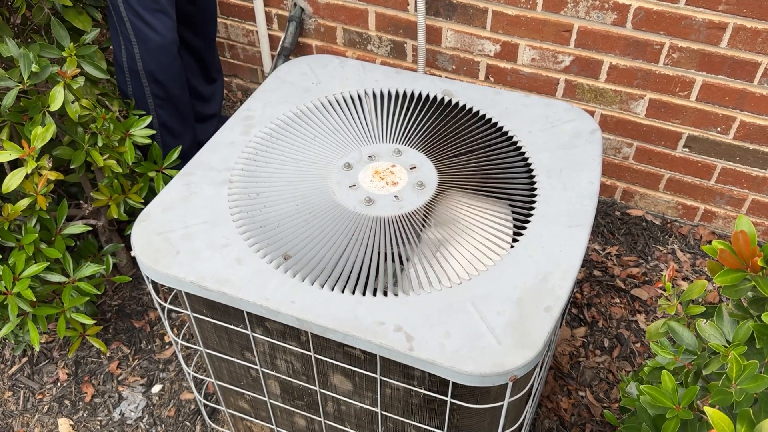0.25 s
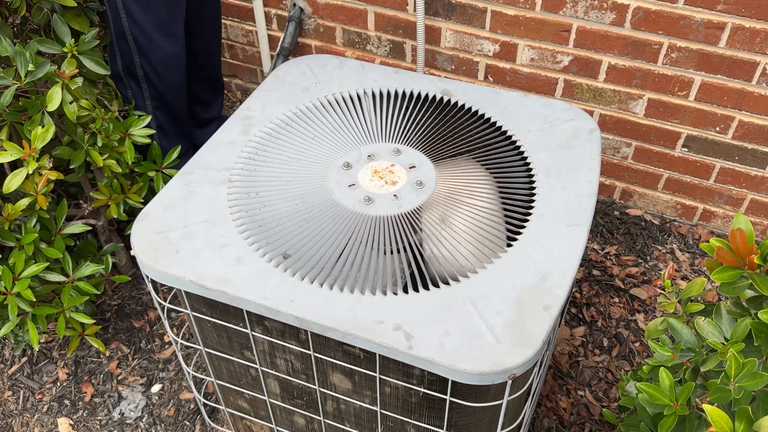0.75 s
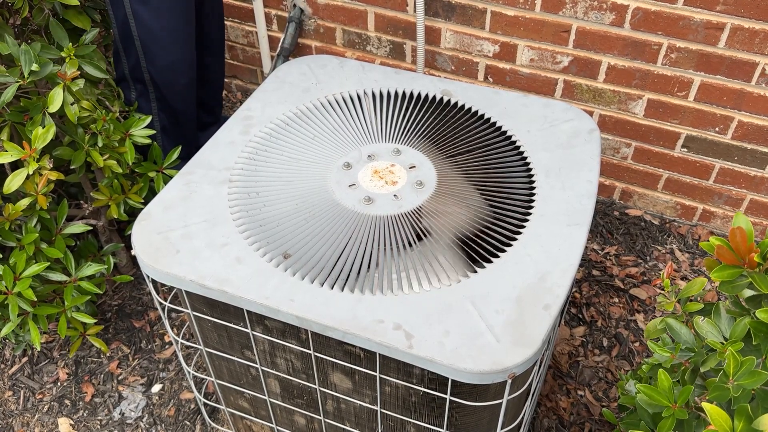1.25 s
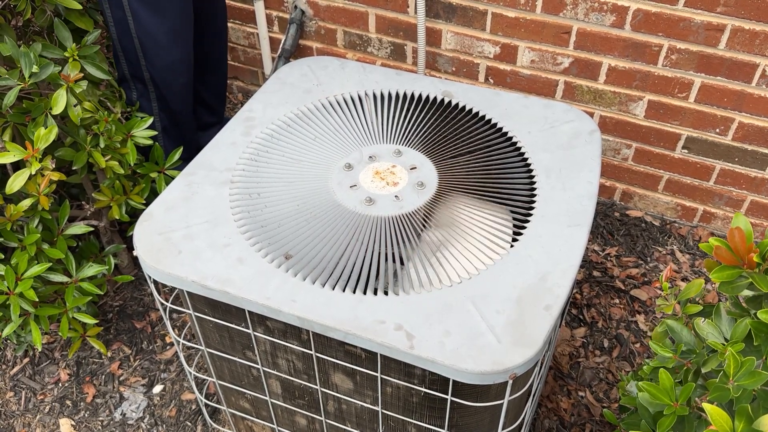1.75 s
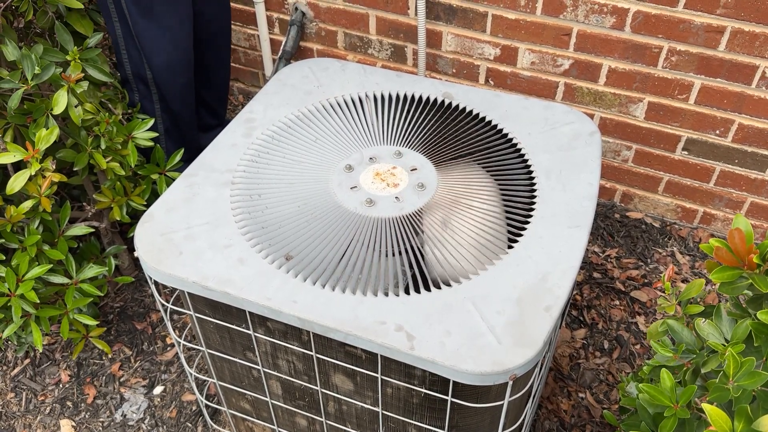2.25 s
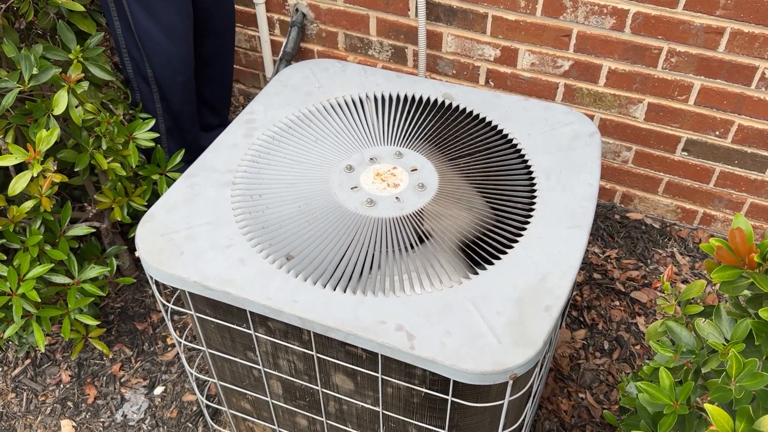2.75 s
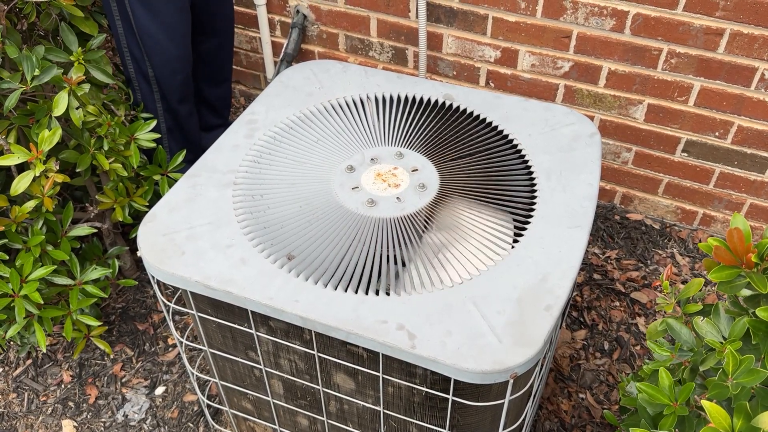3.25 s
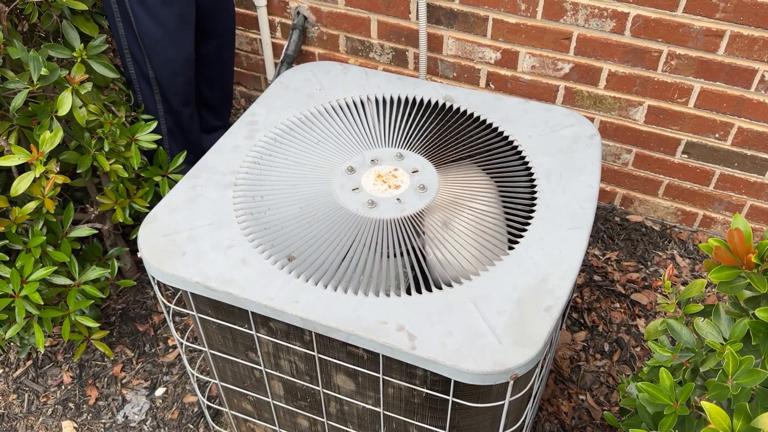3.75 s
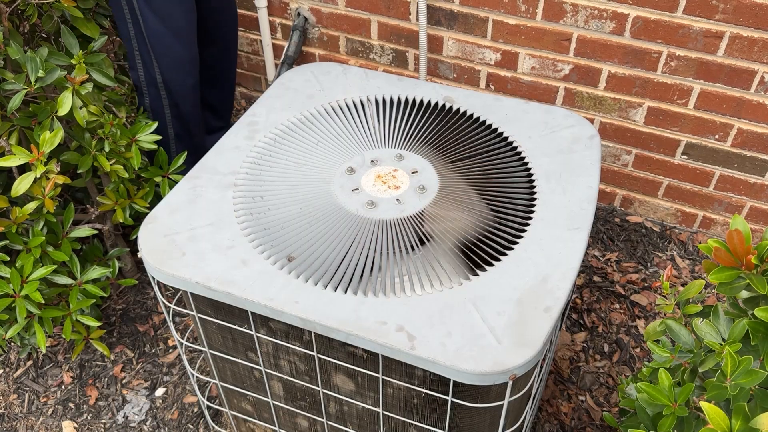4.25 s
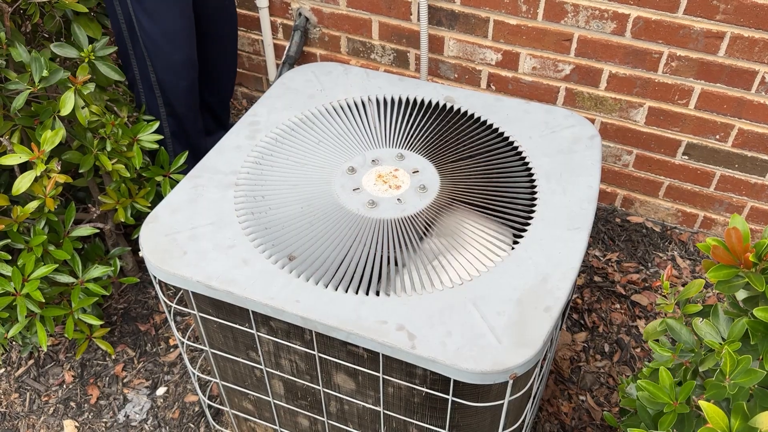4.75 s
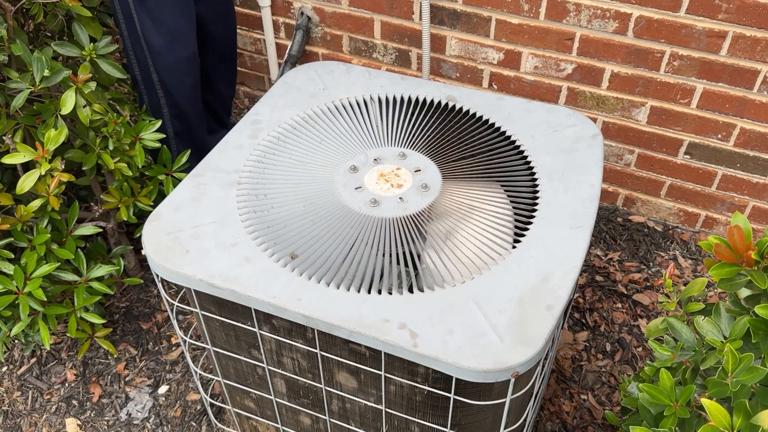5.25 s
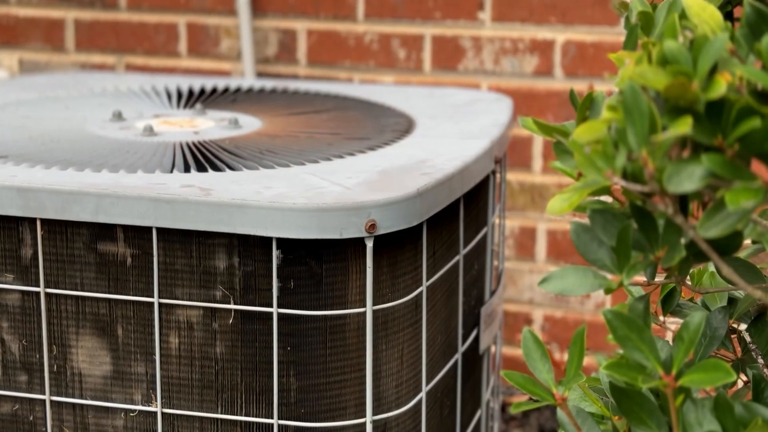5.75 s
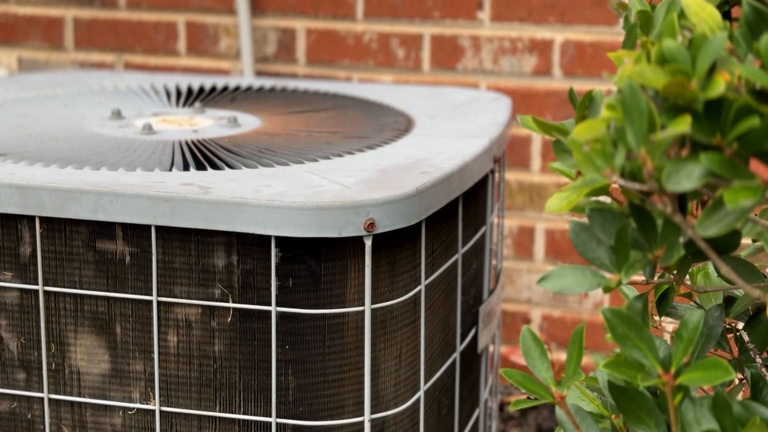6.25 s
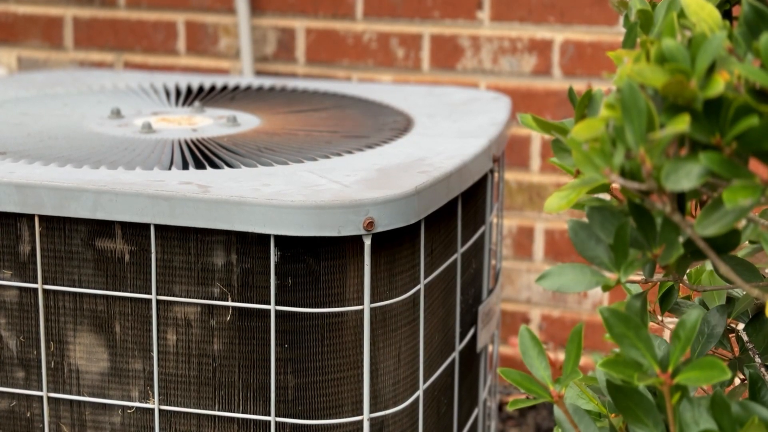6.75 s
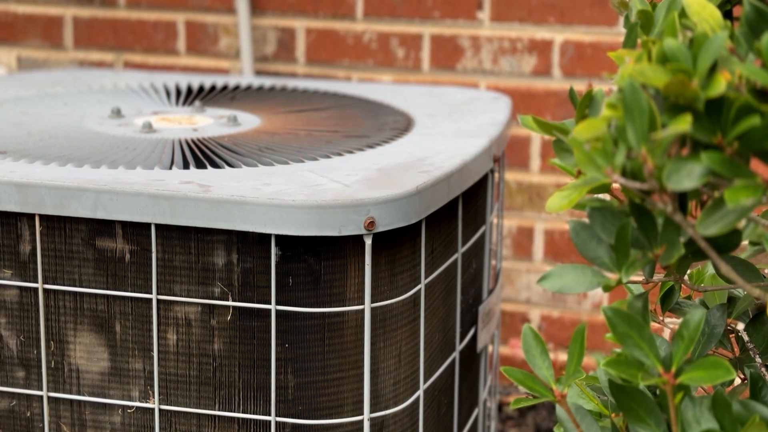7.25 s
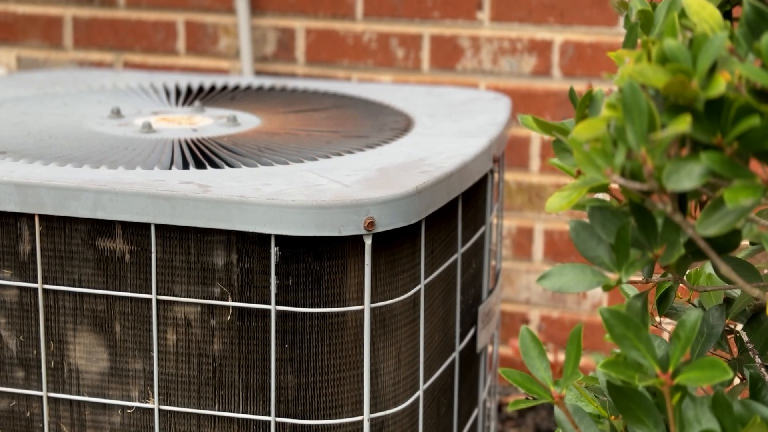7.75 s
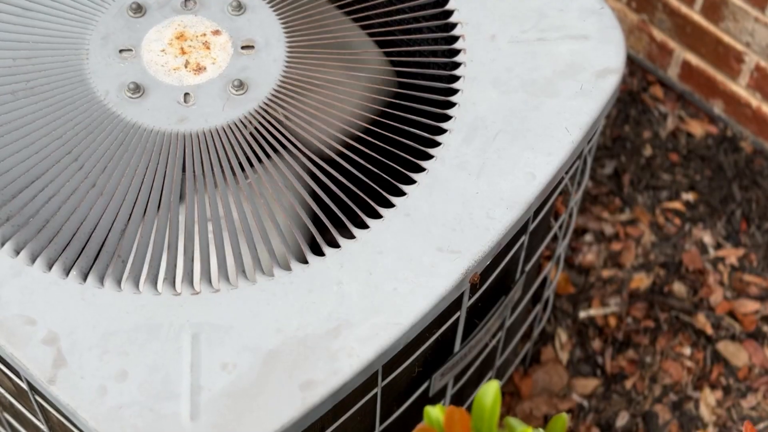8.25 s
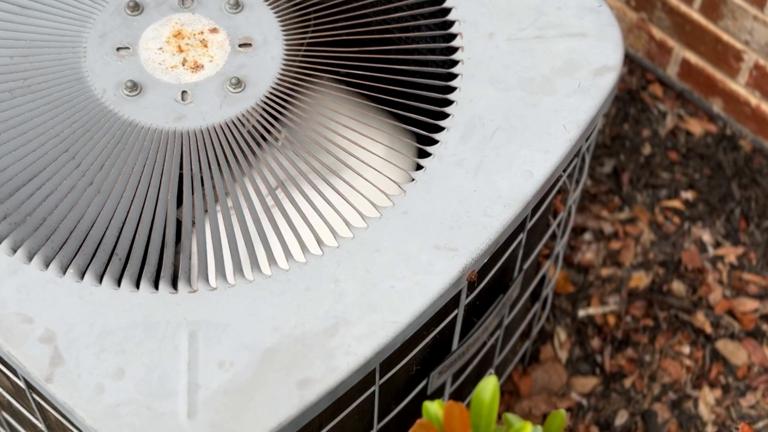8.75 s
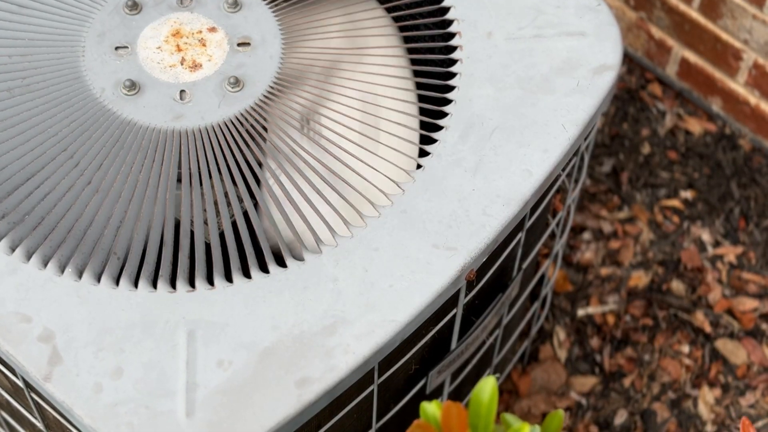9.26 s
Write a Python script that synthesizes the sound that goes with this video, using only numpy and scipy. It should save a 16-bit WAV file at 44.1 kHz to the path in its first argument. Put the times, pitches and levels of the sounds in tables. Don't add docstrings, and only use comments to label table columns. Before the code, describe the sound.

Steady air conditioner drone and whooshing fan air, with a faint distant engine in the middle and one tiny dropout.

```python
import sys
import numpy as np
from scipy import signal
from scipy.fft import rfft, irfft, next_fast_len
from scipy.io import wavfile
from scipy.ndimage import uniform_filter1d

SR = 44100
rng = np.random.default_rng(int(sys.argv[2]) if len(sys.argv) > 2 else 0)


def nominal_scale(level):
    x = np.asarray(level, float) / 20
    return 10 ** x


def file_out(sig):
    cols = np.atleast_2d(sig).T
    lim = np.clip(cols, -1, 1)
    pcm = np.round(lim * 32767).astype(np.int16)
    wavfile.write(sys.argv[1], SR, pcm)


N = 419391

CUTS_S = [
    5.445,
    7.995,
]
DROPOUT_S = [
    7.4322,
    7.4525,
]

# time in seconds, pitch in Hz, peak level in dB.
FAR_ENGINE = [
    (5.46, 205, -42),
    (5.75, 203, -32),
    (6.1, 196, -34),
    (6.4, 192, -34),
    (6.8, 196, -41),
    (7.1, 195, -49),
    (7.45, 182, -49),
    (7.75, 183, -34.5),
    (7.99, 186, -35),
]
ENGINE_PORT_TURN = 0.58

# one place, rate in Hz.
SHAFT_HZ = [
    58.85,
    58.808,
    58.786,
]
BLADE_HZ = [
    57.3,
    57.45,
    57.35,
]
MAINS_HZ = 60.02

# frequency in Hz, level in dB per Hz.
AIR = [
    [(30, -83), (55, -50.5), (130, -51.5), (280, -51), (500, -56), (830, -62.5), (1500, -69.5), (2300, -72),
     (3100, -79), (4700, -82), (7800, -85), (10000, -87.5), (13300, -86.5), (15500, -94)],
    [(30, -83), (55, -51.5), (130, -53), (240, -54), (700, -65), (1050, -67.5), (1500, -73.5),
     (3000, -81.5), (4600, -84), (8300, -88), (9200, -94), (11300, -96.5), (13500, -91), (15500, -95)],
    [(30, -77), (55, -50), (130, -49), (260, -55), (600, -60), (1050, -66), (1800, -75), (3000, -78),
     (4600, -82), (7800, -85.5), (9200, -93), (11300, -92), (13500, -87.5), (15500, -95)],
]
# centre in Hz, width in Hz, lift in dB.
CABINET = [
    [(854, 57, -6.5), (1000, 270, 2.5), (2300, 370, 1), (3600, 420, 3.5), (4550, 200, 4), (5180, 190, 4.5),
     (6640, 260, 0.5), (6570, 530, 2.5)],
    [(169, 13, -3), (800, 140, 3), (1790, 200, 1), (2860, 190, 6.5), (4770, 440, 1.5), (7800, 500, -0.5)],
    [(785, 350, 4), (1510, 370, 2), (2850, 300, 1.5), (6400, 1100, 1)],
]
# multiple, blade level in dB, shaft level in dB, mains level in dB.
HUM = [
    [(1, -40, -51, -59), (2, -36, -36, -52), (3, -42, -47, -55), (4, -39, -38, -37), (5, -44, -56, -56)],
    [(1, -47, -45, -46), (2, -40, -60, -60), (3, -58, -60, -55), (4, -49, -31, -39), (5, -60, -52, -60)],
    [(1, -40, -50, -47), (2, -31, -40, -58), (3, -53, -51, -60), (4, -39, -39, -42), (5, -49, -55, -59)],
]

# multiple, level in dB.
SHELL = [
    [(6, -42), (8, -45), (15, -54), (18, -50), (19, -52), (26, -58), (28, -59), (38, -60), (41, -61),
     (55, -67), (61, -67), (86, -66), (105, -70), (115, -69)],
    [(7, -47), (14, -52), (16, -43), (18, -40), (19, -46), (20, -45), (22, -48), (25, -51), (31, -50),
     (47, -50), (55, -58), (54, -59), (84, -62), (134, -65)],
    [(7, -48), (16, -41), (18, -39), (20, -43), (26, -51), (27, -52), (47, -52), (48, -56), (51, -56),
     (84, -61), (98, -61), (106, -61), (111, -64), (133, -66)],
]
# high shaft multiple, level in dB.
WHINE = [
    [(151, -71), (165, -74), (184, -65), (185, -71), (186, -68), (206, -76), (207, -75), (209, -74),
     (212, -77), (223, -72), (224, -70), (233, -73), (250, -76), (251, -76)],
    [(151, -78), (157, -70), (164, -70), (169, -66), (172, -66), (178, -70), (181, -68), (210, -71),
     (215, -70), (221, -67), (224, -69), (226, -66), (234, -65), (248, -70)],
    [(141, -75), (148, -75), (163, -75), (164, -71), (176, -71), (181, -72), (184, -71), (190, -72),
     (197, -74), (202, -72), (204, -70), (207, -71), (228, -71), (235, -69)],
]
# centre in Hz, width in Hz, lift in dB.
SHELL_RING = [
    [(2750, 500, -7), (5320, 250, 6), (7200, 300, -4)],
    [(1350, 600, 3), (3020, 360, 1), (5450, 300, 2)],
    [(1350, 600, 1.5), (3000, 560, 2), (6960, 500, 4)],
]
# one place, level in dB over the air in 1 Hz, scatter in dB,
# first multiple, speed wander as a fraction, lift at the top in dB.
COMB = [
    (6.5, 4.5, 14, 0, 4.5),
    (12, 6, 14, 1.0e-4, 4.5),
    (10, 6.5, 16, 0, 2),
]
# one place, level in dB.
LINES_DB = [
    1,
    0.17,
    0.1,
]
WAVER_DB = 1.2

# frequency in Hz, shared swing in dB, own flicker in dB.
GUST = [(60, .15, .5), (500, .5, .4), (2000, .95, .4), (5000, 1.6, .3), (12000, 1.8, .3)]
# rate in Hz, size in swings, first crest in seconds.
SWAY = [
    (3.13, .43, .29),
    (2.27, .36, .33),
    (19.13, .27, .038),
]
IN_STREAM = [
    1.0,
    .5,
    .45,
]
PUFF_SWINGS = .55
BUILD_UP_SWINGS, BUILD_UP_S = .9, 1.1

# frequency in Hz, left minus right in dB,
# left lead in radians, likeness from 0 to 1.
PORTS = [
    [(116, -0.3, 0.09, 0.999), (250, 0.0, 0.0, 1.0), (1500, 1.8, -0.06, 0.8), (2400, -4.2, 1.1, 0.72),
     (3100, 0.4, 2.18, 0.55), (3900, 4.0, 2.9, 0.3), (6000, -3.1, -0.6, 0.62), (7800, 1.4, 0.2, 0.4)],
    [(240, -0.3, 0.05, 0.98), (1050, 2.0, 0.15, 0.93), (1750, 2.3, 0.1, 0.75), (2050, 0.0, 0.0, 1.0),
     (2450, 0.0, 0.0, 1.0), (3000, -0.6, 0.53, 0.94), (4800, 0.0, 0.0, 1.0), (8500, 0.0, -0.25, 0.9)],
    [(90, -0.3, 0.03, 1.0), (240, 0.0, 0.27, 1.0), (1100, 0.8, 0.1, 0.96), (1650, 4.0, -0.3, 0.7),
     (2250, 0.0, 0.0, 1.0), (3300, -0.6, 0.5, 0.94), (4800, 0.0, 0.0, 1.0), (8500, 0.0, -0.28, 0.89)],
]
# one place, frequency in Hz.
TREBLE_HZ = [
    8120,
    8750,
    8750,
]
PORT_LAG = 14.5
TREBLE_TURN, TREBLE_LIKE = 0.99, 0.97


def on_log(table, hz, column):
    rows = np.array(table, float)
    return np.interp(np.log(hz + 1e-9), np.log(rows[:, 0]), rows[:, column])


def walk(shape, hold):
    steps = rng.standard_normal(shape)
    steps = uniform_filter1d(uniform_filter1d(steps, hold), hold)
    return steps / steps.std()


def bumps(table, hz):
    return sum(db / (1 + (2 * (hz - centre) / width) ** 2) for centre, width, db in table)


def colour(place, hz):
    return on_log(AIR[place], hz, column=1) + bumps(CABINET[place], hz)


def turns(hz, size, wander):
    drift = np.interp(np.arange(size), np.linspace(0, size, 200), walk(200, hold=6))
    speed = 1 + wander * drift
    return np.cumsum(hz * speed / SR) + rng.random()


def tones(phase, multiples, db):
    period = np.zeros(4097, complex)
    period[multiples] = nominal_scale(db) * np.exp(2j * np.pi * rng.random(len(multiples)))
    wave = irfft(period) * 8192 / np.sqrt(2)
    closed = np.append(wave, wave[0])
    return np.interp(phase % 1 * len(wave), np.arange(len(closed)), closed)


def far_engine():
    s, hz, db = np.transpose(FAR_ENGINE)
    now = np.arange(N) / SR
    hold = 441
    flutter = walk((2, N // hold + 1), hold=5).repeat(hold, axis=1)[:, :N]
    pitch = np.interp(now, s, hz) * (1 + 0.0144 * flutter[0])
    phase = 2 * np.pi * np.cumsum(pitch) / SR
    level_db = np.interp(now, s, db, left=-120, right=-120)
    gain = nominal_scale(level_db + 2.4 * uniform_filter1d(flutter[1], size=hold))
    return gain * np.sin(phase + np.array([[0], [ENGINE_PORT_TURN]]))


def ports(place, lines, air):
    hz = np.fft.rfftfreq(len(lines), 1 / SR)
    rows = np.array(PORTS[place])
    pair = np.interp(hz, rows[:, 0], np.clip(rows[:, 3], 0, 1) * np.exp(1j * rows[:, 2]))
    lag = 2 * np.pi * hz * PORT_LAG / SR
    late = TREBLE_LIKE * np.exp(1j * (np.pi + TREBLE_TURN - lag))
    treble = hz > TREBLE_HZ[place]
    pair = np.where(treble, late, pair)
    like = np.clip(np.abs(pair), 0, 1)
    tilt_db = np.where(treble, 0, np.interp(hz, rows[:, 0], rows[:, 1]))
    side = np.array([[.5], [-.5]])
    shared = rfft(lines) + np.sqrt(like) * rfft(air[0])
    shared = shared * np.exp(1j * side * np.angle(pair))
    own = np.sqrt(1 - like) * rfft(air[1:])
    return irfft(nominal_scale(side * tilt_db) * (shared + own), len(lines))


def gusts(place, seconds, hz):
    frames = len(seconds)
    puffs = signal.lfilter([1], [1, -.7], rng.exponential(1, frames))
    puffs = (puffs - puffs.mean()) / puffs.std()
    sway = sum(size * np.cos(2 * np.pi * rate * (seconds - crest)) for rate, size, crest in SWAY)
    shared = IN_STREAM[place] * (sway + PUFF_SWINGS * puffs)
    shared = shared - BUILD_UP_SWINGS * np.exp(-seconds / BUILD_UP_S)
    groups = walk((24, frames), hold=8)
    group = np.clip(3 * np.log2(hz / 60 + 1), 0, len(groups) - 1).astype(int)
    shared_db = on_log(GUST, hz, column=1)[:, None] * shared
    own_db = on_log(GUST, hz, column=2)[:, None] * groups[group]
    return nominal_scale(shared_db + own_db)


def stir(place, x, start_s):
    hz, seconds, z = signal.stft(x, SR, nperseg=512)
    regions = walk((len(hz) // 2 + 1, len(seconds)), hold=30).repeat(2, axis=0)[:len(hz)]
    depth_db = WAVER_DB * np.clip(hz / 1000, .3, 1)[:, None]
    waver = nominal_scale(LINES_DB[place] + depth_db * regions)
    z = np.concatenate([z[:1] * waver, z[1:]]) * gusts(place, start_s + seconds, hz)
    return signal.istft(z, SR)[1][:, :x.shape[1]]


def fan(place, size, shaft):
    multiples, blade_db, _, mains_db = np.transpose(HUM[place])
    multiples = np.round(multiples).astype(int)
    blade = turns(BLADE_HZ[place], size, wander=0.0024)
    mains = turns(MAINS_HZ, size, wander=0)
    hum = tones(blade, multiples, blade_db) + tones(mains, multiples, mains_db)
    puff = 1 + 0.074 * np.cos(2 * np.pi * blade)
    puff = puff + 0.023 * np.cos(2 * np.pi * blade / 3)
    puff = puff + 0.023 * np.cos(4 * np.pi * shaft)
    hz = np.fft.rfftfreq(size, 1 / SR)
    air = puff * rng.standard_normal((3, size))
    air = irfft(rfft(air) * nominal_scale(colour(place, hz)) * np.sqrt(SR / 2), size)
    return hum, air


def compressor(place, size):
    over_db, scatter_db, first, wander, lift_db = COMB[place]
    multiples = np.arange(1, 266)
    hz = multiples * SHAFT_HZ[place]
    db = colour(place, hz) + over_db + lift_db * multiples / len(multiples)
    db = db + bumps(SHELL_RING[place], hz)
    db = db + scatter_db * np.minimum(rng.standard_normal(len(db)), 1)
    db = db - 30 * (multiples < first)
    shaft_hum = [(row[0], row[2]) for row in HUM[place]]
    for multiple, best_db in SHELL[place] + WHINE[place] + shaft_hum:
        db[int(round(multiple)) - 1] = best_db
    phase = turns(SHAFT_HZ[place], size, wander)
    return tones(phase, multiples, db), phase


def scene():
    edges = [0] + [int(s * SR) for s in CUTS_S] + [N]
    parts = []
    for place, length in enumerate(np.diff(edges)):
        size = next_fast_len(int(length))
        comb, shaft = compressor(place, size)
        hum, air = fan(place, size, shaft)
        stirred = stir(place, np.vstack([comb + hum, air]), edges[place] / SR)
        parts.append(ports(place, stirred[0], stirred[1:])[:, :length])
    return np.hstack(parts) + far_engine()


def band_limit(x):
    return signal.sosfilt(signal.butter(12, 15730, fs=SR, output="sos"), x)


def record(dry):
    s = np.arange(N) / SR
    outside_s = np.maximum(DROPOUT_S[0] - s, s - DROPOUT_S[1])
    live = np.clip(outside_s * 1000, 0, 1)
    return band_limit(dry * live)


dry = scene()
out = record(dry)
file_out(out)
```